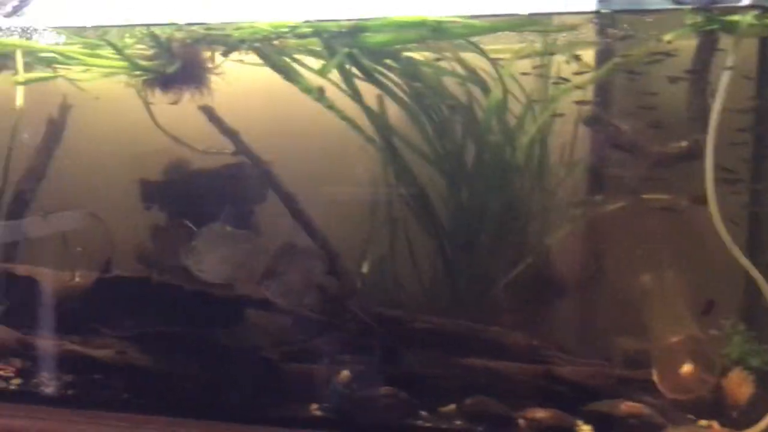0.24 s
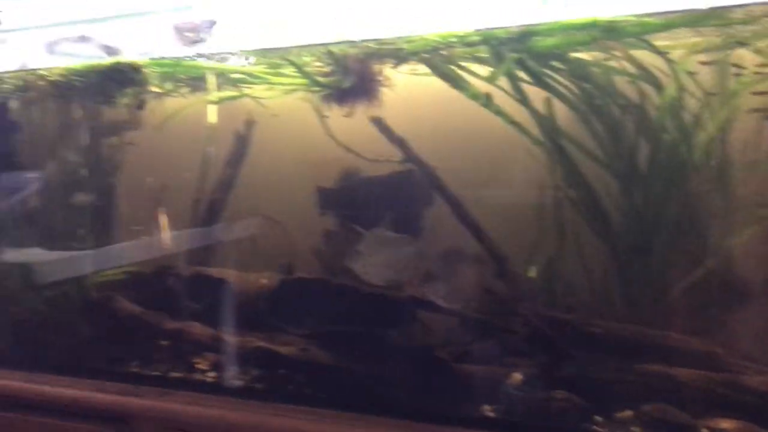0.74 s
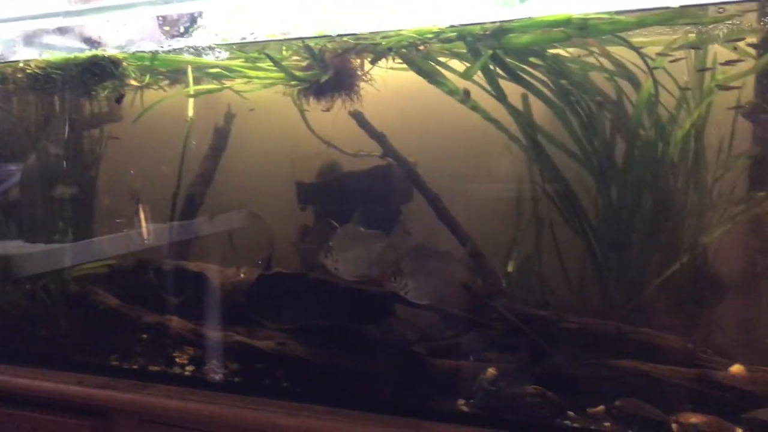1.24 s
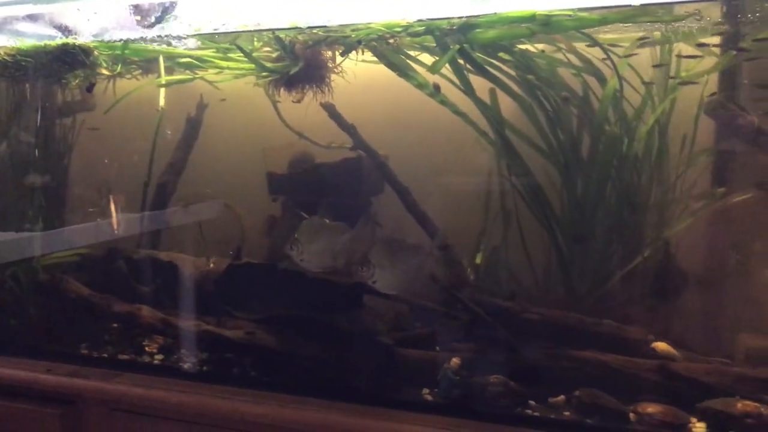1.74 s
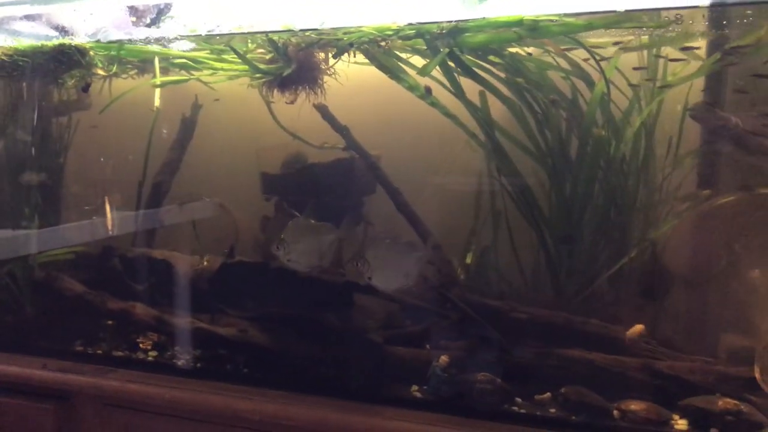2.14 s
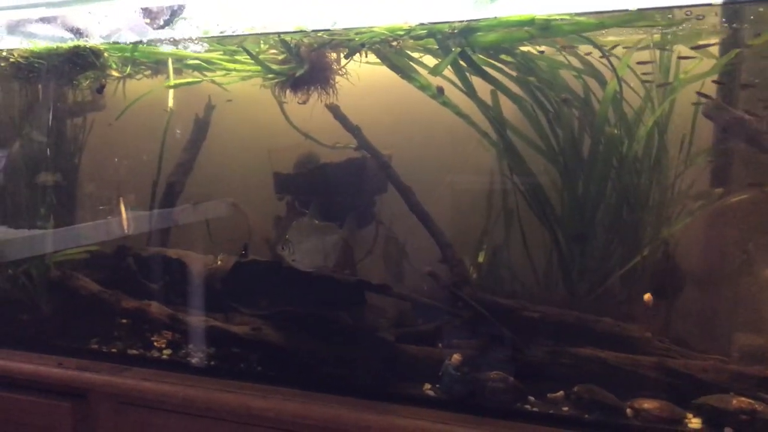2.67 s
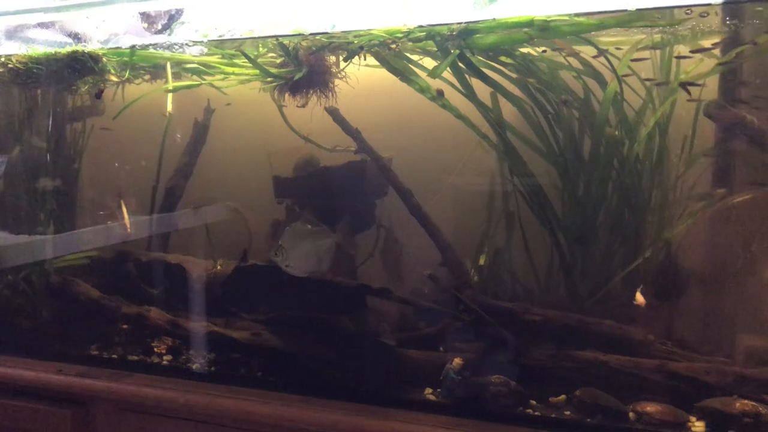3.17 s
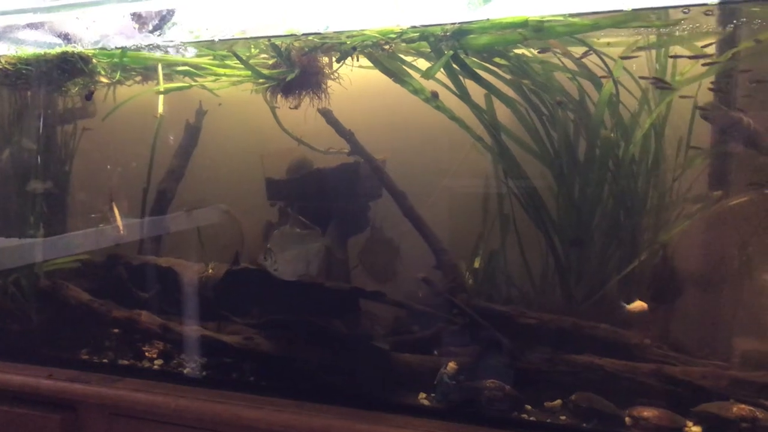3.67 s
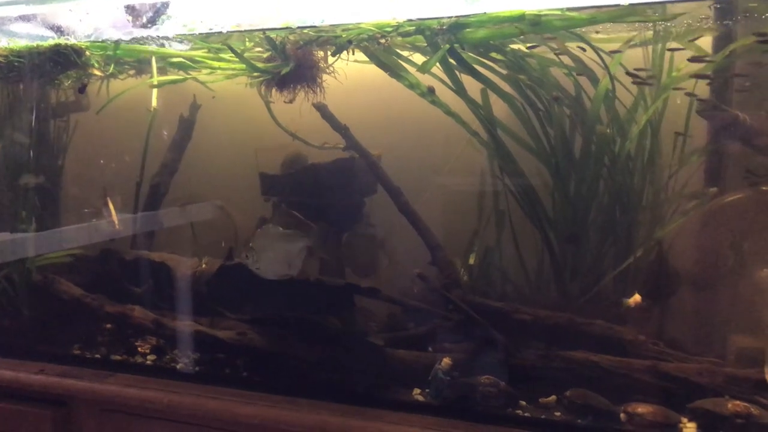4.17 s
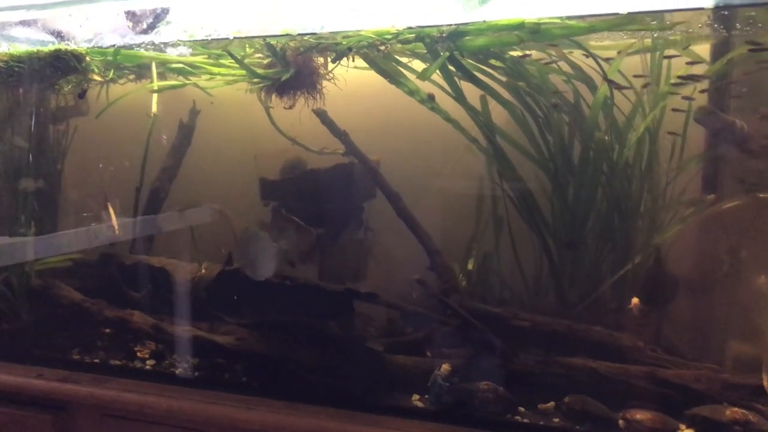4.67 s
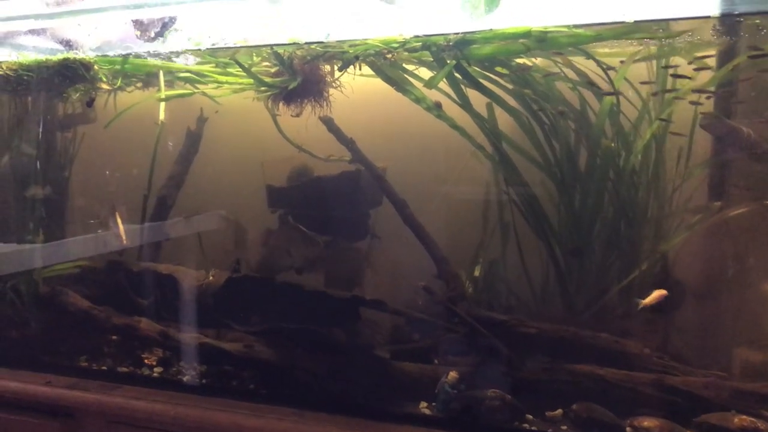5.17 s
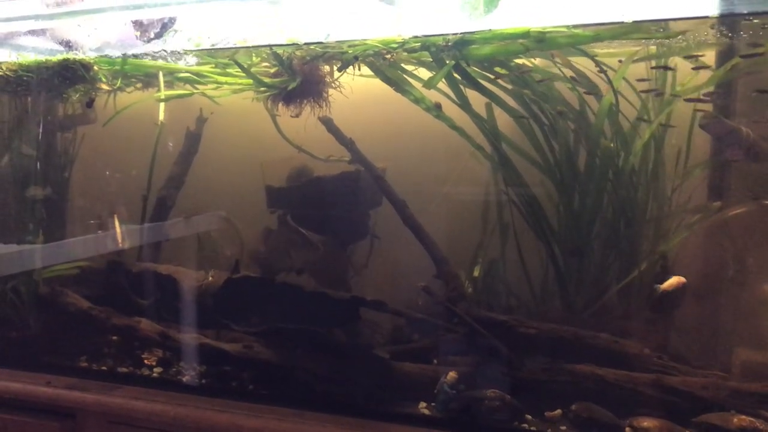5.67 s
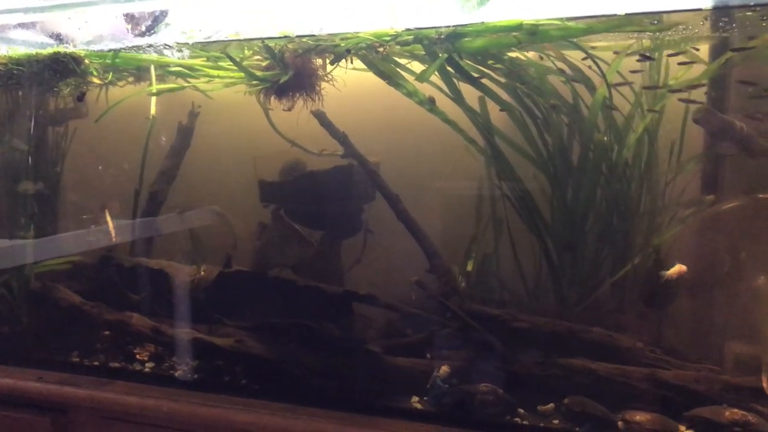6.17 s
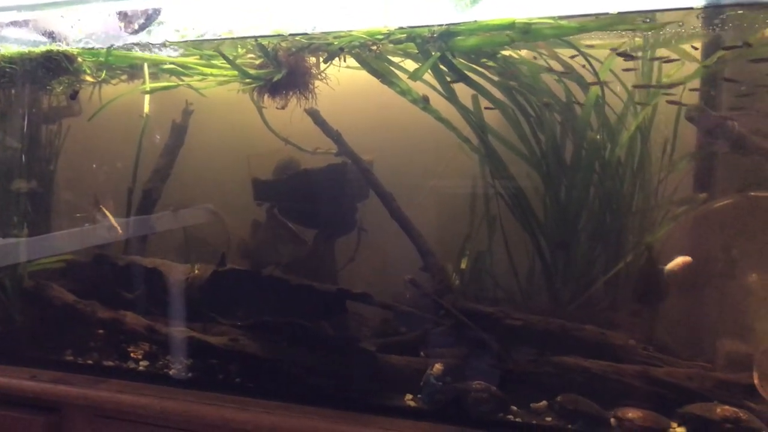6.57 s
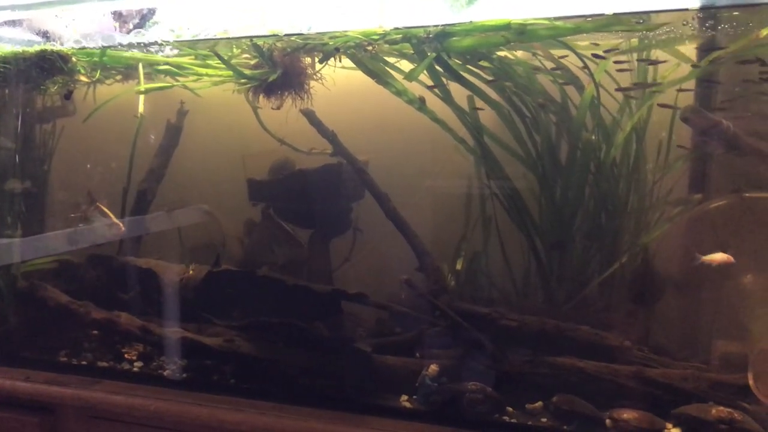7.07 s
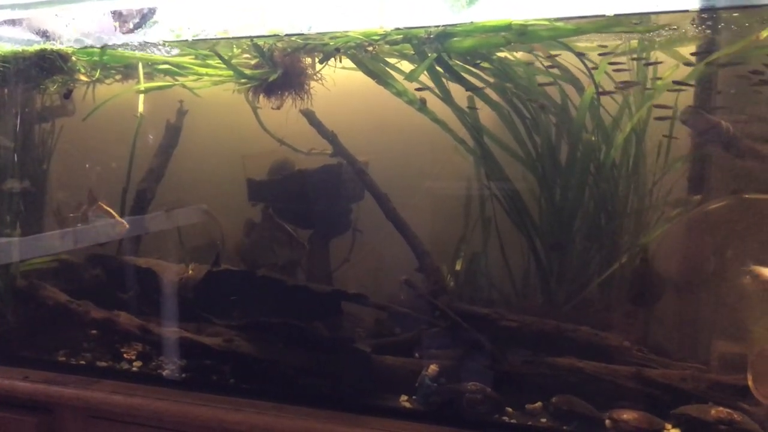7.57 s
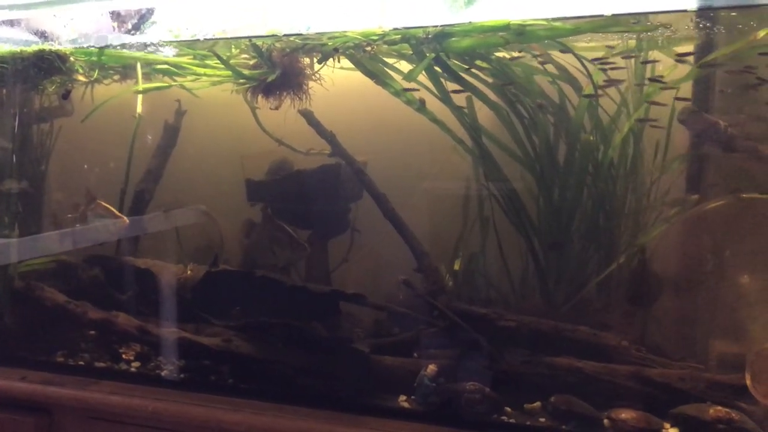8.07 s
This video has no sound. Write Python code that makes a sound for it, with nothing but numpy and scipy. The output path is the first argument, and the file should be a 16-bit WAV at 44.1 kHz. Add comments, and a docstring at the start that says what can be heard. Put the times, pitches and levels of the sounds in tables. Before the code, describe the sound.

A steady stream of filter water gurgles, tinkles and fizzes into a home aquarium, close to the microphone, with short bright echoes between glass and lid. Hollow bubbles and sharp plinks stand out irregularly. Under it lie faint pump hum and low room rumble. A deep idling murmur comes first, then a muffled engine-like drone outside swells, rises in pitch and fades before the end.

```python
"""Filter water trickles into a home aquarium over a pump's mains hum and a low room rumble throughout.
Decaying bubble tones make the gurgle, trickle and fizz; shorter pips and impulses make the spray.
Large bubbles ring the air space under the hood, small ones plink, and all echo between glass and lid.
An idling murmur, a wavering low sine, comes first and ends by 3 s. Then a drone like an engine outside,
a firing tone with weaker orders beside it, swells, climbs in pitch and fades by about 8 s."""
import sys
import numpy as np
from scipy import signal
from scipy.fft import rfft, irfft
from scipy.io import wavfile

SR = 44100
rng = np.random.default_rng(int(sys.argv[2]) if len(sys.argv) > 2 else 0)


def generate_wav(signal):
    """Clip the signal to [-1, 1] and save it as 16-bit WAV at the path in sys.argv[1]."""
    frames = np.transpose(np.atleast_2d(signal))
    scaled = np.clip(frames, -1, 1) * 32767
    pcm = np.round(scaled).astype(np.int16)
    wavfile.write(sys.argv[1], SR, pcm)


N = 366912
T = np.arange(N) / SR

# large bubbles that stand out of the stream: start_s, peak_db, pitch_hz
LARGE_BUBBLES = [(0.622, -41, 1118), (0.951, -47, 1095), (1.28, -40, 1070), (1.329, -41.5, 1247),
                 (1.37, -45, 1180), (1.52, -44, 1096), (2.177, -42, 1030), (2.295, -43, 1126),
                 (3.222, -41, 1100), (3.312, -41, 1033), (3.4, -42.5, 1124), (3.62, -41, 1277),
                 (3.693, -41, 1080), (3.824, -44.5, 1110), (4.736, -36, 1110), (4.981, -42, 1088),
                 (5.212, -36, 1141), (5.254, -44, 1112), (6.253, -42, 1270), (6.616, -41, 1150),
                 (7.114, -40.5, 1120), (7.28, -43.5, 1115), (8.043, -40.5, 1106)]


def amp(db):
    """Level law: twenty decibels are a factor of ten in amplitude."""
    return 10 ** (np.asarray(db) / 20)


def unit(x):
    """Normalization to unit root-mean-square amplitude."""
    return x / np.sqrt(np.mean(x ** 2) + 1e-20)


def curve(rows):
    """Linear interpolation of a timed table (time, value) at every sample."""
    times, values = np.transpose(rows)
    return np.interp(T, times, values)


def add(mix, start_s, sound):
    """Superposition: adds a sound to the mix, in place, from start_s on."""
    part = mix[max(round(start_s * SR), 0):][:len(sound)]
    part += sound[:len(part)]


def colour(x, points):
    """Linear filtering: multiplies the spectrum by a gain curve (Hz, dB), then sets rms 1."""
    hz, db = np.transpose(points)
    f = np.fft.rfftfreq(len(x), 1 / SR)
    gain = amp(np.interp(np.log(f + 1), np.log(hz), db))
    return unit(irfft(rfft(x) * gain, len(x)))


def drift(knots_per_s):
    """Slow random modulation of rms 1: straight lines between Gaussian knots."""
    knots = np.arange(0, N / SR + 1, 1 / knots_per_s)
    return unit(np.interp(T, knots, rng.standard_normal(len(knots))))


def surging(level_db, surge_db):
    """Random amplitude modulation: a stream swells and slackens by surge_db rms about its level."""
    return amp(level_db + surge_db * drift(knots_per_s=14))


def echoes(t60, wet_db):
    """Reverberation between water, glass and lid: sparse reflections fall 60 dB in t60 seconds."""
    t = np.arange(SR // 6) / SR
    present = rng.random(len(t)) < 1 / 10
    taps = rng.standard_normal(len(t)) * present * amp(-60 * t / t60)
    # wet_db: energy of the reflections relative to the direct sound
    response = amp(wet_db) * taps / np.linalg.norm(taps)
    response[0] += 1
    return response


def bubble(hz, cycles, rise):
    """Damped volume pulsation of a pinched-off bubble, its pitch rising as it nears the surface."""
    # age in decay times, each lasting the given number of cycles; rise is the pitch gain per decay time
    age = np.arange(int(5 * cycles * SR / hz) + 2) * hz / (SR * cycles)
    tone = np.sin(2 * np.pi * cycles * (age + rise * age ** 2 / 2))
    onset = 1 - np.exp(-2 * cycles * age)
    return tone * np.exp(-age) * onset


def hood(x, direct_db):
    """Modal resonance: the air space rings at its own modes on top of the direct sound."""
    # air modes under the hood: frequency_hz, bandwidth_hz, peak_gain_db
    air_modes = [(780, 21, -15), (781, 12, -3.5), (797.6, 8.7, -4), (886, 4.9, 2.5), (930.6, 20, 0),
                 (991, 34, -3.5), (1045.4, 46, -1), (1080, 7.8, -15.5), (1105.5, 13.8, 4), (1126, 9.4, 4),
                 (1210, 13, -4.5), (1245.5, 14, 1), (1246, 8.2, -28)]
    t = np.arange(SR // 4) / SR
    ring = np.zeros(len(t))
    for hz, width, db in air_modes:
        decay = np.exp(-np.pi * width * t)
        # the factor with the bandwidth makes each mode peak at its tabled gain
        ring += amp(db) * 2 * np.pi * width / SR * decay * np.cos(2 * np.pi * hz * t)
    return amp(direct_db) * x + signal.oaconvolve(x, ring)[:len(x)]


def impacts(per_s, spread_db):
    """Random point process: impulses of either sign, many small and a few large."""
    size, place, sign = rng.random((int(per_s * N / SR), 3)).T
    excess = np.minimum(-np.log(1 - size), 3.5)  # exponential spread of levels, capped
    train = np.zeros(N)
    train[(place * N).astype(int)] = np.sign(sign - .5) * amp(spread_db * excess)
    return train


def swarm(low_hz, high_hz, per_s, spread_db, cycles, t60, wet_db, count):
    """Incoherent sum of bubbles of many sizes, each size with echoes of its own place in the tank."""
    out = np.zeros(N)
    for hz in np.geomspace(low_hz, high_hz, count):
        heard = signal.fftconvolve(bubble(hz, cycles, rise=0.037), echoes(t60, wet_db))
        one_size = signal.oaconvolve(impacts(per_s / count, spread_db), heard)[:N]
        out += np.sqrt(hz) * unit(one_size)  # even power per Hz on the geometric pitch steps
    return unit(out)


def gurgle():
    """Resonant excitation: large bubbles dragged under by the stream make the hood ring."""
    deep = swarm(695.0, 797, per_s=150, spread_db=3.5, cycles=6.1, t60=0.053, wet_db=-3, count=5)
    body = swarm(903, 1359, per_s=280, spread_db=2, cycles=6.1, t60=0.1, wet_db=-1.5, count=12)
    # levels ahead of the hood
    deep_drive = deep * surging(level_db=-68.5, surge_db=4)
    body_drive = body * surging(level_db=-54, surge_db=1.34) * lulls()
    return hood(deep_drive, direct_db=-8.5) + hood(body_drive, direct_db=-23.0)


def lulls():
    """Amplitude modulation: the gurgle slackens while the air for a large bubble gathers."""
    deepest_db, lead_s, length_s = -6, .11, 0.12
    near, dip = np.zeros(N), np.hanning(int(length_s * SR))
    loudest_db = max(db for _, db, _ in LARGE_BUBBLES)
    for start_s, db, _ in LARGE_BUBBLES:
        add(near, start_s - lead_s, amp(db - loudest_db) * dip)  # deepest for the loudest
    return amp(deepest_db * np.minimum(near, 1))


def trickle():
    """Pitch falls with bubble size: small ones tinkle where water lands, smaller ones fizz."""
    # spectral shaping of the tinkle: frequency_hz, relative_gain_db
    tinkle_shape = [(500, -19), (800, -7), (1400, 1.5), (2000, -1.5), (2600, -1.5), (3100, -1.5),
                    (3700, -5.5), (4400, -15.5), (6000, -22), (16000, -30)]
    # spectral shaping of the fizz: frequency_hz, relative_gain_db
    fizz_shape = [(1500, 4), (3700, -0.5), (4400, 4.5), (5300, -1), (7000, -1.5), (9000, -5.5), (10400, -4),
                  (12000, -10), (16000, -12)]
    small = swarm(1415, 3925, per_s=380, spread_db=3.7, cycles=6.8, t60=0.19, wet_db=2.0, count=20)
    fine = swarm(3673, 9600, per_s=400, spread_db=4.0, cycles=7.3, t60=0.2, wet_db=7.0, count=22)
    tinkle = colour(small, tinkle_shape) * surging(level_db=-60, surge_db=0.67)
    fizz = colour(fine, fizz_shape) * surging(level_db=-61, surge_db=0.87)
    return tinkle + fizz


def spray():
    """Broadband impulses: the tiniest bubbles burst in short pips and droplets tick on the surface."""
    # spectral shaping of the spray: frequency_hz, relative_gain_db
    spray_shape = [(1000, -1.5), (3000, -6.5), (6000, 5.5), (9600, -3.5), (10400, -8.5), (11400, -1.5),
                   (13000, -1.5), (15000, -1), (16000, 3)]
    pips = swarm(8470, 15000, per_s=330, spread_db=6, cycles=4.6, t60=0.15, wet_db=8.0, count=14)
    ticks = np.zeros(N)
    for _ in range(4):  # four places, each with its own echoes
        drops = impacts(per_s=35, spread_db=4.0)
        ticks += signal.oaconvolve(drops, echoes(t60=0.11, wet_db=10))[:N]
    return colour(amp(-1.0) * unit(ticks) + pips, spray_shape) * amp(-59.0)


def splatter():
    """Common modulation: the uneven fall of the stream shakes trickle and spray together."""
    return amp(0.84 * drift(knots_per_s=30))


def clump(hz, cycles, rise, trail_s, trail_db, scatter, count=4):
    """Superposed pulsations: one bubble with weaker ones of nearly its size trailing behind."""
    out = np.zeros(SR // 8)
    add(out, 0, bubble(hz, cycles, rise))
    for delay, size in rng.random((count, 2)):
        trailing_hz = hz * (1 + scatter * (2 * size - 1))
        add(out, delay * trail_s, amp(trail_db) * bubble(trailing_hz, cycles, rise))
    return out


def single_bubbles(rows, t60, wet_db, direct_db, **shape):
    """Source and path in series: each clump is convolved with its own echoes and the hood's ring."""
    out = np.zeros(N)
    air = hood(signal.unit_impulse(SR // 5), direct_db)
    for start_s, db, hz in rows:
        echoed = signal.fftconvolve(clump(hz, **shape), echoes(t60, wet_db))
        heard = signal.fftconvolve(echoed, air)
        add(out, start_s, amp(db) * heard / abs(heard).max())
    return out


def gulps():
    """Lowest pulsation pitch: clumps of the largest bubbles."""
    # start_s, peak_db, pitch_hz
    largest = [(0.325, -49, 763), (0.43, -49, 808), (0.728, -42.5, 866), (0.85, -45.5, 860),
               (0.935, -52, 774), (2.025, -47, 742), (3.094, -48.5, 800), (3.21, -46.5, 825),
               (3.55, -46, 806), (3.973, -44, 774), (4.23, -50, 782), (4.415, -51, 770),
               (4.535, -47.5, 760), (4.618, -41.5, 787), (4.935, -48, 760), (4.995, -44.5, 770),
               (5.21, -44, 798), (5.8, -50, 776), (6.065, -45, 784), (6.277, -48, 750), (6.675, -45.5, 840),
               (7.186, -52, 770), (7.393, -47, 794)]
    return single_bubbles(largest, t60=0.11, wet_db=-4.5, direct_db=-4.5, cycles=7.8, rise=.025,
                          trail_s=.035, trail_db=-3, scatter=.08)


def glugs():
    """Weakly damped pulsation: large bubbles ring near the hood's modes."""
    return single_bubbles(LARGE_BUBBLES, t60=0.2, wet_db=-2.5, direct_db=-5, cycles=6.5, rise=0.0062,
                          trail_s=.04, trail_db=-11.5, scatter=.2)


def plinks():
    """Higher pulsation pitch: splashes of small bubbles."""
    # start_s, peak_db, pitch_hz
    splashes = [(0.344, -50, 2920), (0.425, -44, 2640), (0.429, -43, 6800), (0.594, -42, 1650),
                (0.636, -43.5, 6500), (0.987, -43, 3580), (1.798, -47, 6060), (2.138, -39.5, 3080),
                (2.460, -38.5, 1880), (2.638, -40, 2500), (2.781, -44.5, 3590), (2.815, -42, 3020),
                (2.943, -44, 5440), (2.991, -44, 4300), (2.993, -44, 7100), (3.090, -43.5, 2520),
                (3.144, -46, 3030), (3.497, -38.5, 4500), (4.116, -46, 7100), (4.226, -47.5, 4250),
                (4.337, -46, 4260), (4.695, -36.5, 7760), (4.798, -40.5, 4320), (4.845, -46, 5080),
                (5.019, -42, 2670), (5.117, -43.5, 7550), (5.235, -45.5, 6260), (5.587, -43.5, 6050),
                (5.615, -43, 6420), (6.242, -42.5, 1599), (6.630, -43, 2737), (6.961, -46, 2460),
                (7.016, -43, 3030), (7.078, -43, 2340), (7.204, -44, 6340), (7.304, -44, 3600),
                (7.32, -41, 3120), (7.968, -46, 2690), (8.128, -42.5, 4180)]
    return single_bubbles(splashes, t60=0.22, wet_db=5.0, direct_db=-10.5, cycles=4.4, rise=0.014,
                          trail_s=0.016, trail_db=-11, scatter=0.21)


def pops():
    """Heavily damped pulsation: bursting droplets decay within a cycle."""
    # start_s, peak_db, pitch_hz
    bursts = [(0.8096, -42, 12100), (0.8914, -36.5, 10000), (1.3947, -37, 11100), (1.6496, -44, 9200),
              (1.8058, -44, 12000), (1.944, -38, 11800), (3.0784, -40.5, 9550), (4.9112, -43, 12700),
              (5.6456, -51, 14870), (6.3677, -46, 14920), (7.2056, -47, 14700), (7.3885, -47, 15200)]
    return single_bubbles(bursts, t60=0.097, wet_db=10.5, direct_db=-4, cycles=0.66, rise=.015,
                          trail_s=.01, trail_db=-19, scatter=.1)


def pump():
    """Harmonic line spectrum: mains hum of the pump, each line wavering by 1 dB rms."""
    # frequency_hz, level_db (rms, about which the line wavers)
    hum_lines = [(50, -69), (100, -76), (200, -73.5), (300, -74), (400, -92), (500, -80.5)]
    out = np.zeros(N)
    for hz, db in hum_lines:
        line = np.sin(2 * np.pi * (hz * T + rng.random()))
        out += np.sqrt(2) * amp(db + drift(2.3)) * line
    return out


def murmur():
    """Frequency and amplitude modulation: the engine idles with a deep, unsteady tone."""
    # idling before the engine pulls away: time_s, level_db (rms, about which the tone flutters)
    idle_level = [(0, -75), (0.5, -65), (0.72, -55.5), (1.6, -61), (1.8, -54), (2.4, -54), (2.7, -72),
                  (3.1, -95)]
    idle_hz, wander_hz, flutter_db = 63.9, 0.94, 2
    turns = np.cumsum(idle_hz + wander_hz * drift(4.73)) / SR
    gain = amp(curve(idle_level) + flutter_db * drift(7.45))
    return np.sqrt(2) * gain * np.sin(2 * np.pi * turns)


def drone():
    """Engine orders: a far engine's climbing firing tone with other multiples of its working cycle."""
    # speed of the engine: time_s, firing_rate_hz
    firing_rate = [(3.2, 105.9), (3.5, 106.7), (4.1, 102.6), (4.48, 109.5), (4.81, 108), (5.01, 112),
                   (5.75, 118.9), (6.8, 135), (7.2, 138.5), (7.5, 151.2), (8.32, 163)]
    # firing tone: time_s, level_db (rms, about which the tone flutters)
    firing_level = [(3.0, -77), (3.17, -61), (3.48, -45.5), (3.7, -53.5), (3.94, -45.5), (4.2, -55.5),
                    (4.45, -49), (4.95, -45.5), (5.6, -46.5), (6.3, -44.5), (6.75, -50.5), (7.15, -56.5),
                    (7.5, -60), (7.9, -78)]
    # weaker orders, which come out as the engine labours: time_s, common_level_db
    labour_level = [(2.9, -80), (3.5, -68), (7.0, -64), (7.5, -55.5), (8.0, -66.5)]
    # weaker orders: cycles_per_working_cycle, db_relative_to_common_level
    weak_orders = [(5, -2.5), (6, -1.5), (7, -0.5), (9, -10), (11, -15.5), (13, -12)]
    flutter_db = 1.44
    turns = np.cumsum(curve(firing_rate)) / SR
    firing_gain = amp(curve(firing_level) + flutter_db * drift(14))
    firing = firing_gain * np.sin(2 * np.pi * turns)
    # eight firings make one working cycle; uneven cylinders add its other multiples
    cycle = turns / 8
    beating = np.zeros(N)
    for order, db in weak_orders:
        beating += amp(db) * np.sin(2 * np.pi * (round(order) * cycle + rng.random()))
    return np.sqrt(2) * (firing + amp(curve(labour_level)) * beating)


def room():
    """Filtered white noise: low rumble of the house under a faint wash."""
    # spectral shape of the rumble: frequency_hz, relative_gain_db
    rumble_shape = [(20, -30), (40, -15), (54, -3), (62, -1.5), (78, -17), (112, -5.5), (150, -15.5),
                    (200, -36), (400, -37.5), (1000, -86)]
    # rumble over time: time_s, level_db
    rumble_level = [(0, -56), (3.5, -57), (4.0, -58), (6.7, -56.5), (8.3, -54.5)]
    # spectral shape of the wash: frequency_hz, relative_gain_db
    wash_shape = [(60, -14), (120, -1), (170, -9), (245, 1), (340, -9), (550, -11), (1100, -0.5),
                  (4000, -21), (16000, -22)]
    rumble = colour(rng.standard_normal(N), rumble_shape) * amp(curve(rumble_level))
    wash = colour(rng.standard_normal(N), wash_shape) * amp(-60.5 + 0.87 * drift(5.2))
    return rumble + wash


def scene():
    """Superposition of water, pump and surroundings at one microphone."""
    stream = gurgle() + (trickle() + spray()) * splatter()
    bubbles = gulps() + glugs() + plinks() + pops()
    background = pump() + murmur() + drone() + room()
    return (stream + bubbles + background)[None]


def record(dry):
    """Band limitation: a linear-phase low-pass filter sets the recorder's upper edge."""
    edge_hz = 15800
    low_pass = signal.firwin(511, edge_hz, window=("kaiser", 9), fs=SR)
    return signal.oaconvolve(dry, low_pass[None], "same")


dry = scene()
out = record(dry)
generate_wav(out)
```